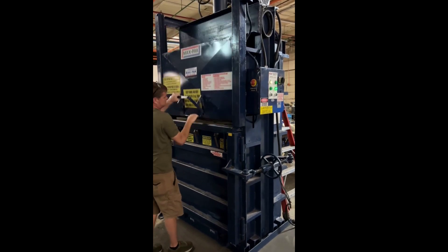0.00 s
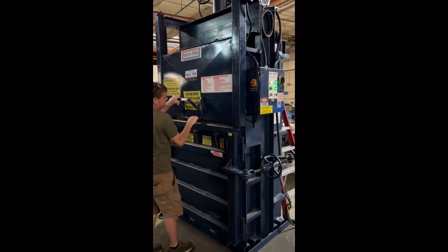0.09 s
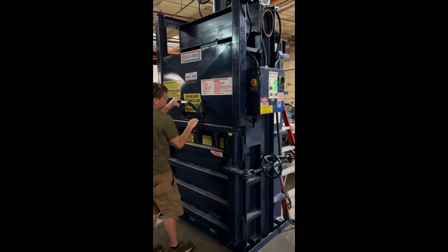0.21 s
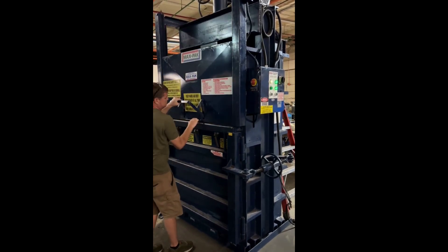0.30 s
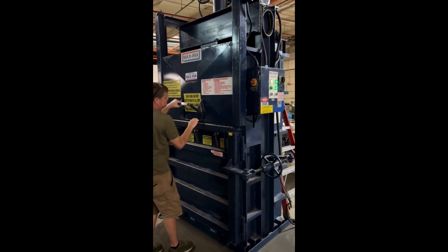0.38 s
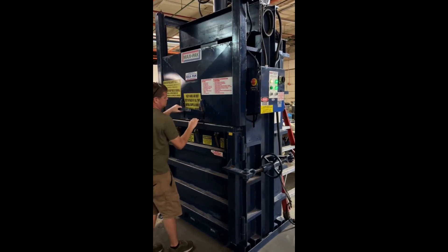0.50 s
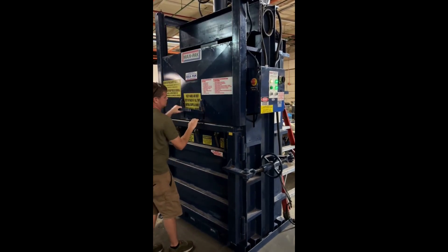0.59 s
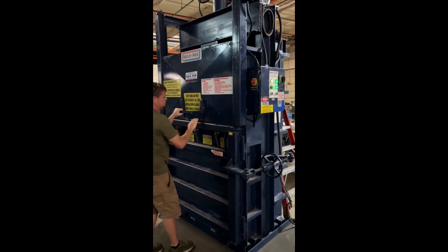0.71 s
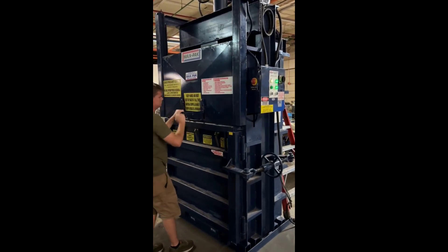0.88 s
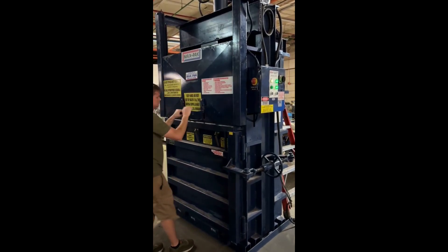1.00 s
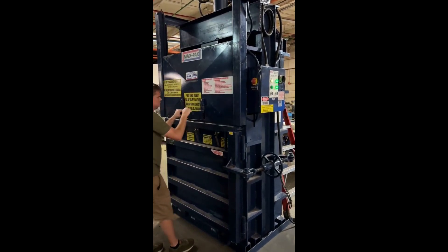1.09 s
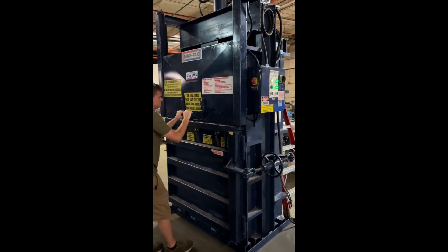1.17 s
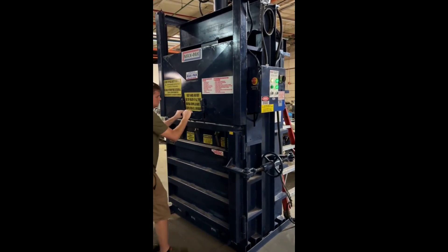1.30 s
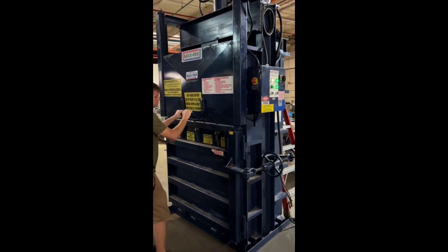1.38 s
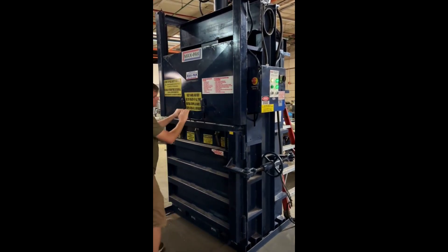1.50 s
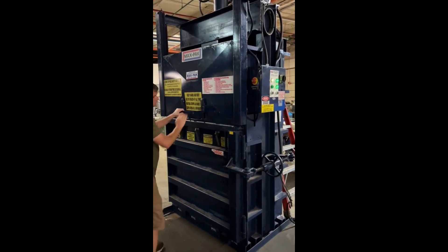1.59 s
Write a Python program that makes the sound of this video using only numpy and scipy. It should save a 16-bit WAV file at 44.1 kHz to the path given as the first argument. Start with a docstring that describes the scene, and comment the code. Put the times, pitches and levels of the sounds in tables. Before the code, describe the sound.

A heavy steel gate crashes down, rattles, then shuts with a double clank in a warehouse.

```python
"""A steel baler gate in a warehouse, heard from nearby on a spaced pair of microphones.
Over low room tone the gate is pulled down: it rumbles in its guides and crashes onto the chamber door.
It rattles, its latch and loose fittings tick, and steel scrapes on steel as it settles.
A second after the crash it is pushed home against the frame with a double clank.
Each blow rings the heavy steel panels, and the hall answers with a long, dark tail."""
import sys
import numpy as np
from scipy import signal
from scipy.fft import rfft, irfft
from scipy.io import wavfile
from scipy.ndimage import map_coordinates

SR = 44100
rng = np.random.default_rng(int(sys.argv[2]) if len(sys.argv) > 2 else 0)


def master_out(mix):
    """Clip the mix to full scale and print it as 16-bit PCM to the path in sys.argv[1]."""
    frames = np.transpose(np.atleast_2d(mix))
    ceiling = np.clip(frames, -1, 1)
    pcm = np.round(ceiling * 32767).astype(np.int16)
    wavfile.write(sys.argv[1], SR, pcm)


N = 70560
TIME = np.arange(N) / SR
HZ = np.fft.rfftfreq(2 * N, 1 / SR)  # the frequencies that filters work on

# likeness of near sound at the two microphones: (frequency [Hz], correlation [capped at 1 in use])
NEAR_LIKENESS = [(100, 2.3), (500, 0.96), (1200, 0.9), (2300, 0.16), (4800, 0.54), (5900, 1.75),
                 (7000, 0.76), (8000, 0.88), (10300, 0.996), (14000, 0.43)]
# the same for sound from farther off in the hall: (frequency [Hz], correlation)
FAR_LIKENESS = [(100, 1), (300, 0.98), (700, 0.49), (2000, 0.53), (4800, 0.14), (5900, 1), (7000, 1),
                (8000, 1), (14000, 1)]


def amp(db):
    """Decibels to gain."""
    return 10 ** (np.asarray(db) / 20)


def decay(t60, t=TIME):
    """An envelope that falls 60 dB in t60 seconds."""
    return np.exp(-np.log(1000) * t / t60)


def along(points, hz=HZ):
    """(frequency, value) points read on a log frequency axis."""
    freqs, values = np.transpose(points)
    return np.interp(np.log(hz + 1), np.log(freqs + 1), values)


def filtered(x, response):
    """x through a frequency response given on HZ."""
    return irfft(rfft(x, 2 * N) * response, 2 * N)[..., :N]


def causal(gain):
    """The minimum-phase response with this gain: nothing sounds ahead of a blow."""
    cepstrum = irfft(np.log(np.maximum(gain, 1e-6)))
    cepstrum[1:N] *= 2
    cepstrum[N + 1:] = 0
    return np.exp(rfft(cepstrum))


def unit_rms(gain):
    """A gain curve scaled to rms 1."""
    return gain / np.sqrt(np.mean(gain ** 2))


def colour(spectrum):
    """Gain that gives white noise this spectrum at unchanged power."""
    return unit_rms(amp(along(spectrum)))


def stereo_noise(likeness):
    """White noise at the two microphones, with a given left-right correlation."""
    angle = np.arccos(np.clip(along(likeness), -1, 1)) / 2
    mid, side = filtered(rng.standard_normal((2, N)), np.array([np.cos(angle), np.sin(angle)]))
    return np.array([mid + side, mid - side])


def dying(x, t60s):
    """Each frequency of x dies at its own speed."""
    hz, t, bands = signal.stft(x, SR, nperseg=256)
    bands = bands * decay(along(t60s, hz)[:, None], t)
    return signal.istft(bands, SR, nperseg=256)[1][:, :N]


def wobble(rate):
    """A smooth random curve, rate knots a second."""
    return map_coordinates(rng.standard_normal(size=400), [TIME * rate], mode="wrap")


def room_tone():
    """The low, steady background of the warehouse."""
    # the hall's background noise: (frequency [Hz], relative density [dB])
    spectrum = [(25, -4), (60, 9.5), (130, -2.5), (250, -7.5), (600, -7.5), (2000, -20), (6000, -34),
                (15000, -52)]
    return amp(-45.5) * filtered(stereo_noise(FAR_LIKENESS), colour(spectrum))


def slide():
    """The gate rumbles down its guides until it lands."""
    # the rumble's swell: (time [s], level [dB])
    swell = [(0, -37), (.11, -36.5), (0.181, -43), (0.241, -15.5)]
    # steel running in the guides: (frequency [Hz], relative density [dB])
    guides = [(24, -38), (40, -28), (216, -8), (355, -18.5), (582, -15), (910, -25), (3830, -37),
              (5700, -44.5), (7310, -44), (15000, -48)]
    times, levels = np.transpose(swell)
    envelope = amp(np.interp(TIME, times, levels, right=-np.inf))
    return envelope * filtered(stereo_noise(FAR_LIKENESS), colour(guides))


def panel_ripple():
    """Gain of the many narrow resonances of a steel panel, at random pitches."""
    # how far the resonances stand out: (frequency [Hz], spread [dB])
    spread = [(500, 0), (1500, 1.5), (4000, 3), (14000, 4)]
    spacing_hz = 45
    peaks = map_coordinates(rng.standard_normal(size=1000), [HZ / spacing_hz], mode="wrap")
    depth = along(spread)
    return amp(depth * peaks - depth ** 2 * np.log(10) / 20)  # the offset holds the mean power near 1


def scrape():
    """Steel rubs on steel as the gate settles."""
    # the rubbing faces: (frequency [Hz], relative density [dB])
    spectrum = [(200, -30), (520, 16.5), (850, -8), (1300, -28), (5000, -36), (8000, -17), (9500, -20),
                (12000, -50)]
    start_s, rise_s = 0.637, 0.015
    t = np.maximum(TIME - start_s, 0)
    stroke = (1 - np.exp(-t / rise_s)) * decay(t60=0.58, t=t)
    rubbing = filtered(stereo_noise(FAR_LIKENESS), colour(spectrum) * panel_ripple())
    return amp(-30.5) * stroke * rubbing


def chatter(depth_db=3.5):
    """A fast, uneven gain: steel faces meeting in many tiny contacts."""
    return unit_rms(amp(depth_db * wobble(rate=700)))


def ringing(modes, scatter_db=3):
    """Struck steel's decaying modes, each at a new strength and slightly unsteady in pitch."""
    out = np.zeros(N)
    for hz, db, t60 in modes:
        wander_hz = 8 * np.sqrt(hz / 1000)
        cycles = hz * TIME + rng.random() + wander_hz * np.cumsum(wobble(3 * wander_hz)) / SR
        out += amp(db + scatter_db * rng.normal()) * decay(t60) * np.sin(2 * np.pi * cycles)
    return out


def fittings():
    """The latch and loose fittings strike the gate: each ticks sharply and rings thinly."""
    # the small parts' strikes: (time [s], level [dB], tilt [dB per octave], relative ring [dB])
    strikes = [(.048, -38.5, 2, -25), (0.2056, -26.5, -4.5, -12), (.234, -20.5, 0, -18),
               (.244, -30, -4, -18), (.256, -33, -2, -7), (.282, -24, -0.5, -26), (.295, -19.5, 2, -10),
               (.302, -18.5, -1, -9), (.328, -28, 3.5, -15), (.438, -34, 0, -12), (0.448, -32.5, 5.5, -16),
               (.461, -31.5, 2.5, -14), (1.154, -28.5, 4.5, -23), (1.160, -37, -9.5, -24),
               (1.174, -22, -5, -26), (1.179, -29.5, -6, -22)]
    # a tick before its tilt: (frequency [Hz], relative density [dB])
    spectrum = [(100, -45), (300, -22), (1200, -4), (2300, 3.5), (4500, -5), (8000, -5), (13000, -8),
                (16000, -20)]
    # the fittings' modes: (frequency [Hz], relative level [dB], t60 [s])
    modes = [(2990, -2, .15), (3450, -5, 0.48), (4136, -9, 0.2), (5200, -1.5, 0.38), (6520, 5.5, 0.078),
             (7380, -5, .25), (8120, -10, 0.48), (9300, -6.5, 0.35), (11350, -12, 0.33), (11260, -11, 0.35),
             (12150, -22, .25), (12990, -15, 0.36), (13590, -12, 0.25), (14400, -22, .15)]
    octaves = np.log2(np.maximum(HZ, 100) / 4800)  # the tilt pivots at 4800 Hz
    out = np.zeros((2, N))
    for time_s, db, tilt_db, ring_db in strikes:
        burst = stereo_noise(NEAR_LIKENESS) * chatter() * decay(t60=0.046)
        tick = filtered(burst, causal(colour(spectrum)))
        strike = filtered(tick, causal(amp(tilt_db * octaves))) + amp(ring_db) * ringing(modes)
        start = round(time_s * SR)
        out[:, start:] += amp(db) * strike[:, :N - start]
    return out


def clanks(blows, modes, modes_db):
    """Each blow cracks, then rings a few strong modes, the dense modes of the panels, and the hall."""
    # the panels' dense ring: (frequency [Hz], relative density [dB])
    panel_spectrum = [(25, -43), (50, -15), (80, -1), (130, -2), (270, -2), (450, -5.5), (700, -1),
                      (1000, -7), (2300, -16), (5000, -22.5), (8000, -19.5), (13000, -25), (16000, -58)]
    # the panels' damping: (frequency [Hz], t60 [s])
    panel_t60 = [(80, 0.49), (300, 0.57), (800, 0.17), (2500, 0.23), (8000, 0.17), (15000, 0.086)]
    # the hard burst at contact, against the panels' spectrum: (frequency [Hz], gain [dB])
    crack_gain = [(100, -15), (300, -7), (680, 4.5), (1000, -5.5), (1500, -4.5), (2400, -2), (8000, -1.5)]
    # the hall's tail, against the panels' spectrum: (frequency [Hz], gain [dB])
    hall_gain = [(80, -11.5), (300, -9.5), (800, -11), (2500, -12), (8000, -11), (14000, -19)]
    # the hall's reverberation time: (frequency [Hz], t60 [s])
    hall_t60 = [(80, 2.15), (300, 1.5), (1000, 0.98), (3000, 1.31), (8000, 0.6742), (14000, 0.45)]
    # centres of a blow's boom, body, 0 dB anchor, clash, sizzle and glint: (frequency [Hz])
    band_centres = [90, 260, 800, 2900, 8000, 13000]
    panel = causal(colour(panel_spectrum) * panel_ripple())
    hall_build = 1 - np.exp(-TIME / 0.016)
    out = np.zeros((2, N))
    for time_s, db, rise_s, crack_db, boom, body, clash, sizzle, glint in blows:
        dense_ring = dying(stereo_noise(NEAR_LIKENESS), panel_t60)
        reverb = dying(stereo_noise(FAR_LIKENESS), hall_t60)
        tail = filtered(reverb, amp(along(hall_gain))) * hall_build
        contact = chatter() * filtered(stereo_noise(NEAR_LIKENESS), amp(along(crack_gain)))
        crack = amp(crack_db) * contact * decay(t60=0.058)
        attack = 1 - np.exp(-TIME / rise_s)
        steel = filtered((crack + dense_ring + tail) * attack, panel)
        steel += amp(modes_db) * ringing(modes) * attack
        tone_db = along(list(zip(band_centres, [boom, body, 0, clash, sizzle, glint])))
        start = round(time_s * SR)
        out[:, start:] += filtered(steel, causal(amp(db + tone_db)))[:, :N - start]
    return out


def landing():
    """The gate crashes onto the chamber door and rattles."""
    # blows on the door: (time [s], level [dB], rise [s], then relative gains:
    # crack [dB], boom [dB], body [dB], clash [dB], sizzle [dB], glint [dB])
    blows = [(.047, -49, 0.00084, 9.5, -24, 7, 7.5, 3, 9), (.188, -42, 0.012, -15, -2, 23.5, 23, 10, -6),
             (.2055, -11.5, 0.0046, 8, -10.5, -11, -1, -6, -8.5),
             (.233, -18.5, 0.0055, -2.5, 14.5, 6.5, 7, 5.5, 10),
             (.282, -17.5, 0.0018, 11, 5, -0.5, 3, -0.5, -30), (.296, -17.5, 0.0032, 5.5, 1.5, 1, 13, 6, 3),
             (.318, -24, 0.0048, -22, 12, 18, 6.5, -19, 4), (.430, -23, 0.0044, -2, -2.5, 2, 3.5, -2.5, 0),
             (.447, -28.5, 0.0021, 11, 4.5, 7.5, 2, -1, 0),
             (.503, -29, 0.00069, -5, -15.5, 9.5, -17, 0.5, -17),
             (.576, -39, 0.016, -1, 15.5, 10.5, 14, 7.5, -17), (.638, -30, 0.009, 14, -17, 2.5, 4, 7, -2),
             (.655, -23, 0.017, -1, -6.5, 0, -0.5, -17, -20)]
    # the gate's strongest modes: (frequency [Hz], relative level [dB], t60 [s])
    gate_modes = [(84.2, -2.5, 0.52), (141, -14, 1), (215.1, -3.5, 0.67), (273.6, -3, 0.34),
                  (322.5, -7.5, 0.46), (415, -13.5, 0.99), (621.6, -5, 0.23), (649, -12, 0.4),
                  (758.6, -6.5, 0.18), (895, -15, 0.13), (1043, -9.5, 0.32), (1400, -15, 0.45),
                  (2340, -10.5, 0.34), (3650, -25, 0.36)]
    return clanks(blows, gate_modes, modes_db=-5.5)


def closing():
    """The gate is pushed home and rings the frame with a double clank."""
    # blows on the frame: (time [s], level [dB], rise [s], then relative gains:
    # crack [dB], boom [dB], body [dB], clash [dB], sizzle [dB], glint [dB])
    blows = [(1.1545, -22.5, 0.0028, -5, 0, 6, 2.5, 0, 8), (1.172, -14, 0.0034, 8.5, 0, -1, 1, -10, -3),
             (1.203, -28, 0.012, 10, 10.5, 10, -6, 3, -6), (1.343, -43, 0.0018, 3, 21.5, 10, -7, -19, -16)]
    # the frame's strongest modes: (frequency [Hz], relative level [dB], t60 [s])
    frame_modes = [(99.5, -1.5, 0.31), (162.1, -6, 0.65), (239.7, -6, 1.24), (347, -11, 0.57),
                   (411, -1.5, 0.25), (560, -4, 0.52), (655.3, -4, 0.28), (727, -1.5, 0.29),
                   (1016, -11, 0.43), (1400, -10, 0.34), (1543, -1, 0.2), (2014, -16, 0.34),
                   (2373, -2.5, 0.22), (2600, -29, 0.35)]
    return clanks(blows, frame_modes, modes_db=-7.5)


def scene():
    """The gate slides, lands, settles and closes over the warehouse's room tone."""
    return slide() + landing() + fittings() + scrape() + closing() + room_tone()


def record(dry):
    """Two spaced microphones that differ in level and arrival time, band-limited to 16 kHz."""
    # level difference across the pair: (frequency [Hz], left over right [dB])
    balance = [(100, -1), (300, 1.2), (600, 2.5), (1100, 4), (2300, -2), (4500, -0.5), (9000, 0)]
    # arrival difference across the pair: (frequency [Hz], lead of the left [s])
    left_lead = [(100, -.00013), (1100, -.0001), (1750, 0), (2500, .0002), (3500, .0002), (4300, .000255),
                 (6000, .000248), (16000, .000242)]
    sides = np.array([[0.5], [-0.5]])  # each microphone takes half of the difference
    gain = amp(sides * along(balance))
    phase = np.exp(2j * np.pi * HZ * sides * along(left_lead))
    return filtered(dry, gain * phase * (HZ < 16000))


dry = scene()
out = record(dry)
master_out(out)
```